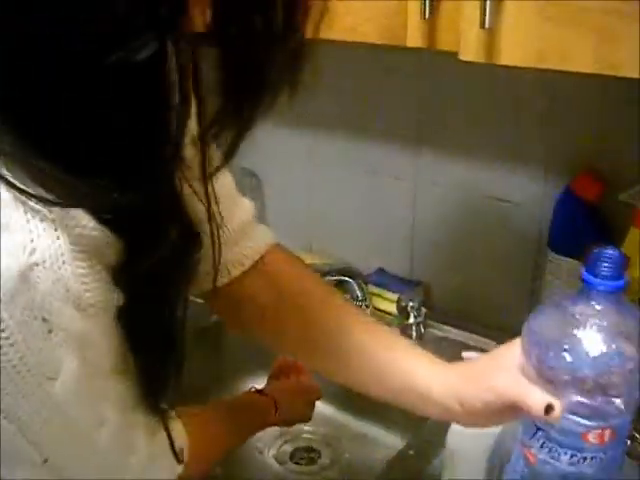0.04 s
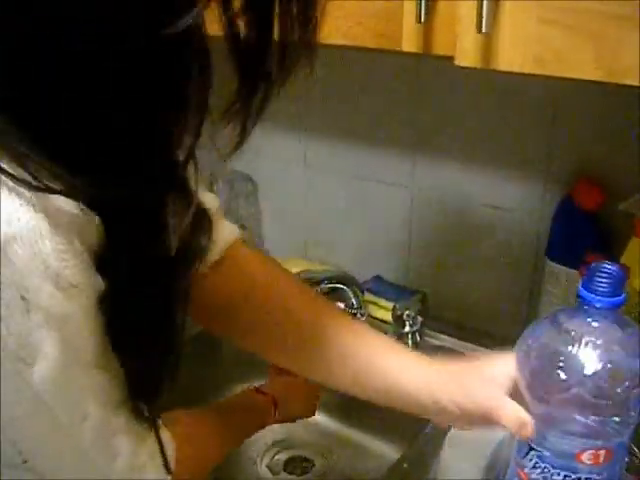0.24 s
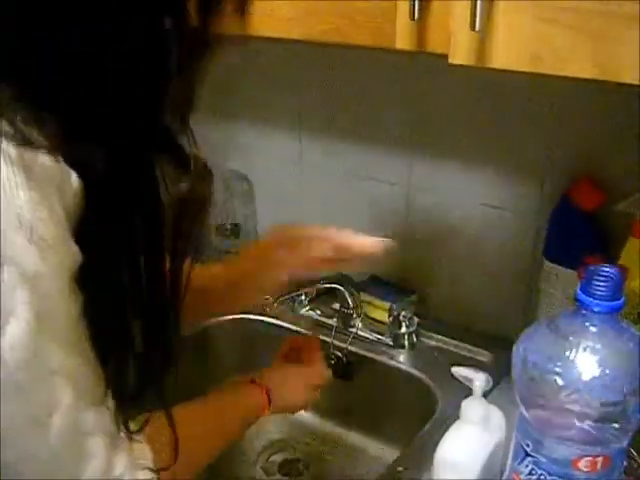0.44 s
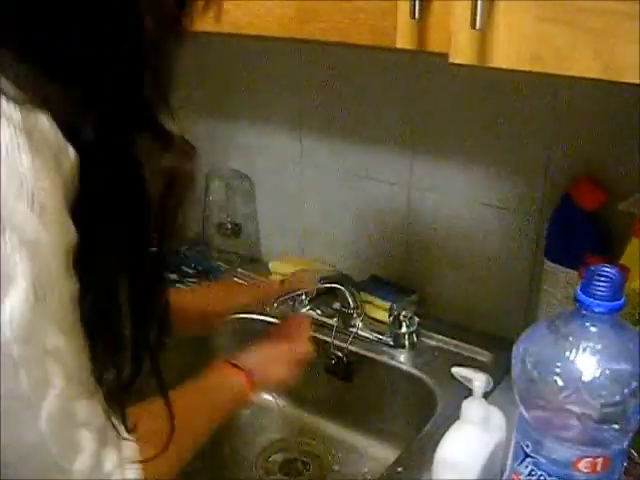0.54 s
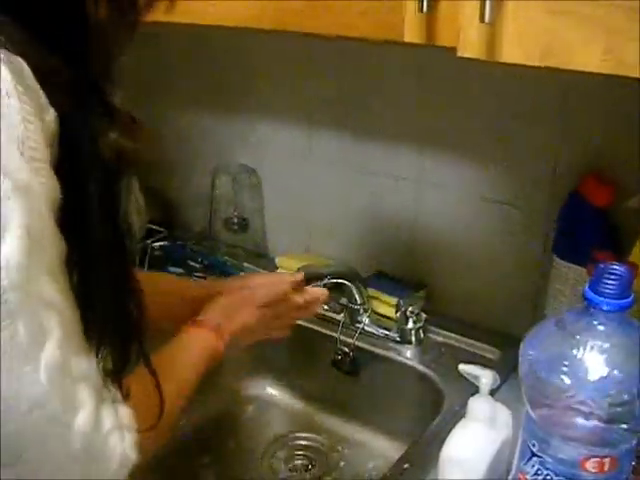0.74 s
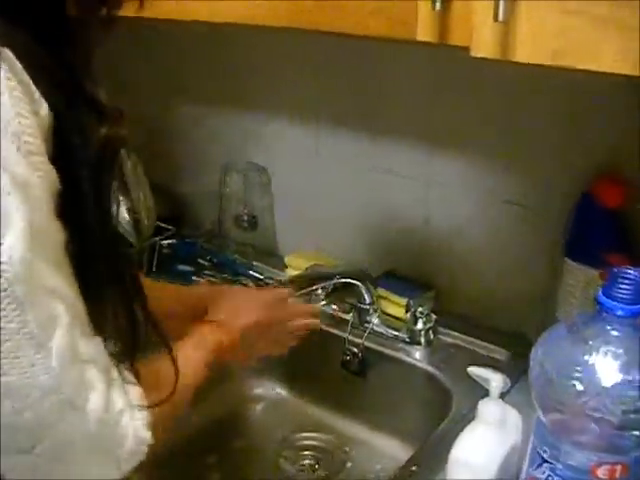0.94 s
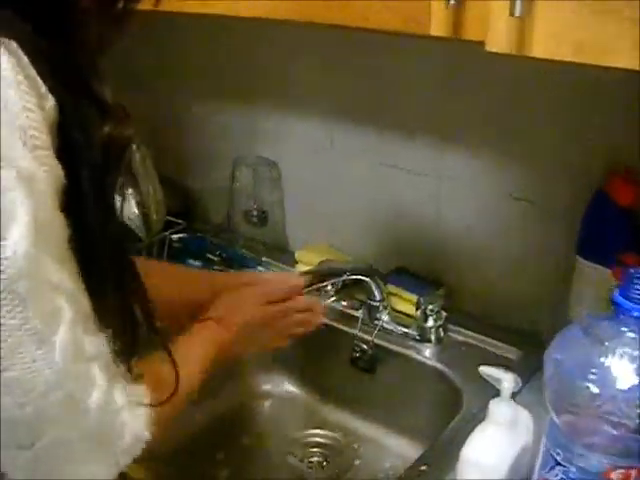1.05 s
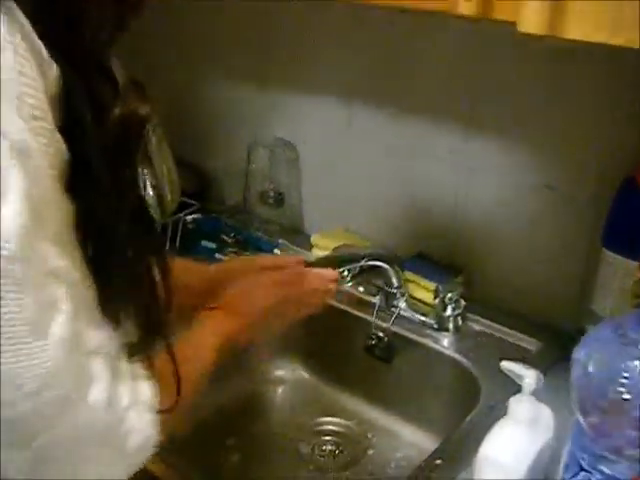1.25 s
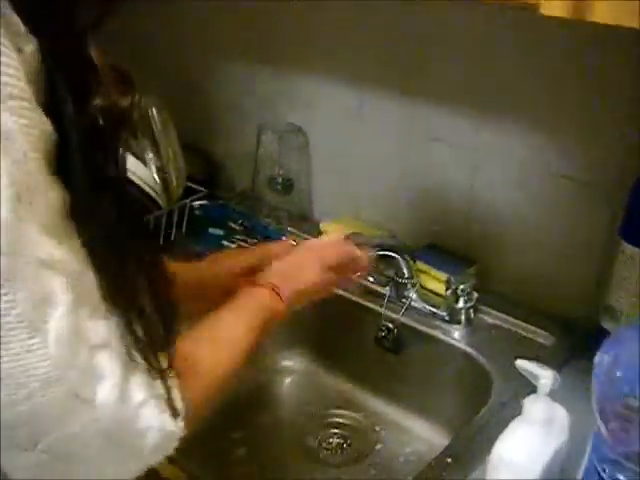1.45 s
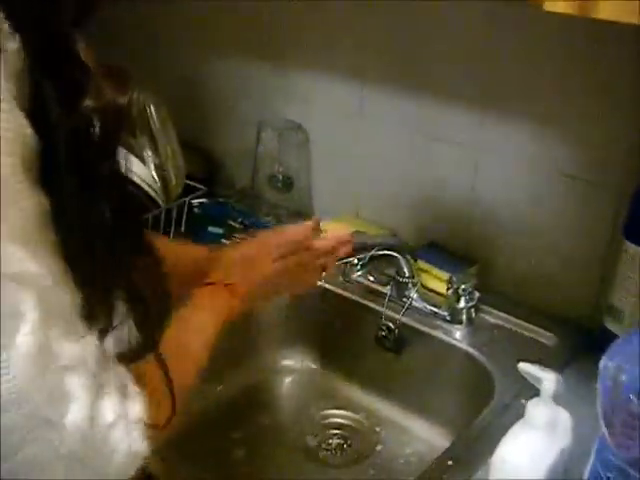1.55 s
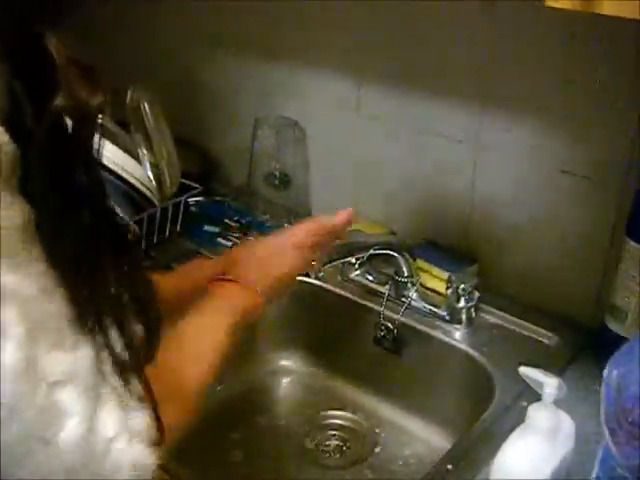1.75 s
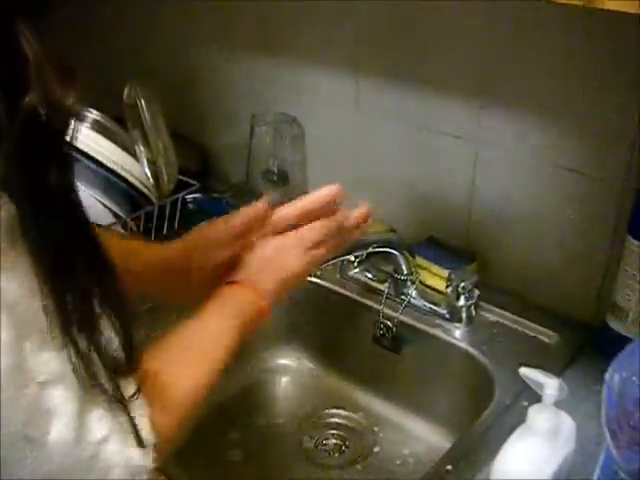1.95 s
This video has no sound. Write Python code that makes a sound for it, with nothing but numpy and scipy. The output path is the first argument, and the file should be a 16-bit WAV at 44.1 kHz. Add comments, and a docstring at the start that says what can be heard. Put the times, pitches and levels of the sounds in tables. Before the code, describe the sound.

Wet hands rubbing together, just after a plastic bottle thuds onto a kitchen worktop.

```python
"""A large plastic bottle is set down beside a steel sink and rocks to rest: each knock rings the
worktop, which booms, while the cupboard rattles and the bottle's thin wall crinkles.
Then wet hands meet and rub: skin swishes, the water film fizzes, air pockets pop, and the palms
slap, twice softly and once harder. A small kitchen, heard through a hissy little microphone;
a thin, high hiss at the start fades as the bottle lands."""
import sys
import numpy as np
from scipy import signal
from scipy.fft import rfft, irfft
from scipy.io import wavfile

SR = 44100
rng = np.random.default_rng(int(sys.argv[2]) if len(sys.argv) > 2 else 0)


def output_pcm(signal):
    """Save a mono or channel-first signal as 16-bit PCM at the path in sys.argv[1].

    Samples are clipped to [-1, 1] before scaling.
    """
    pcm = np.clip(np.atleast_2d(signal).T, -1, 1) * 32767
    wavfile.write(sys.argv[1], SR, np.round(pcm).astype(np.int16))


N = 88200
T = np.arange(N) / SR

# the bottle hits the worktop, each contact favouring one pitch: start_s, level_db, pitch_hz
BOTTLE_KNOCKS = [(0.0285, -16.5, 240), (0.0519, -16.5, 83), (0.153, -3.5, 420), (0.1599, -5, 97.5),
                 (0.1898, -11, 132), (0.2109, -13, 195), (0.2389, -13.5, 89)]
# ringing modes of worktop, sink and bottle: pitch_hz, level_db, t60_s
WORKTOP_MODES = [(40.3, -19, 1.25), (95.3, -13, 1), (120.2, 4, 0.14), (140.87, 0.5, 0.33),
                 (158, -8.5, 0.56), (185.4, -11, 0.78), (248, -10, 0.22), (378, -6.5, 0.056),
                 (398.1, -18, 0.57), (425, 0.7, 0.036), (1056, -20.5, 0.26), (1227, -10.5, 0.076)]
# tone of the cupboard's rattle: frequency_hz, level_db
RATTLE_SPECTRUM = [(45, -20), (80, 1), (170, -5), (290, -4.5), (550, -4), (1100, -17.5), (2000, -26),
                   (5500, -25.5), (14000, -33.5)]
# the bottle's thin wall crinkles: start_s, length_s, level_db, centre_hz
WALL_CRINKLES = [(0.1528, 0.0069, -28.5, 2050), (0.166, 0.015, -28.5, 3180), (0.29, 0.019, -32.5, 6720),
                 (0.327, 0.022, -40, 5400)]
# the water film is squeezed out: start_s, length_s, level_db, centre_hz, spread_octaves
WATER_SQUIRTS = [(0.4622, 0.017, -33.5, 9000, 0.71), (0.7405, 0.02, -27, 6450, .95),
                 (0.973, 0.033, -41, 11000, 0.68), (1.03, 0.0082, -36, 13100, .2),
                 (1.108, 0.024, -31, 9500, .9), (1.235, 0.017, -33, 5900, 0.47),
                 (1.255, 0.02, -38, 13000, .3), (1.4146, 0.002, -24, 5660, 0.84),
                 (1.612, 0.0073, -32, 10500, 0.33), (1.655, 0.014, -38, 14000, 0.32),
                 (1.675, .014, -31.5, 3640, .5), (1.786, 0.0077, -28.5, 6000, 0.41),
                 (1.928, 0.0056, -24.5, 4000, 1.5)]
# soft bumps against the sink cupboard: peak_s, half_length_s, level_db
CUPBOARD_BUMPS = [(0.575, 0.013, -44), (0.95, 0.06, -46), (1.208, 0.03, -32.5), (1.81, 0.028, -39)]
# body of the bumped cupboard: pitch_hz, level_db, width_hz
CUPBOARD_MODES = [(170, 4, 60), (310, -6, 104)]
# fader ride of the hand strokes: time_s, level_db
STROKE_LEVELS = [(0.70, -67), (0.77, -46), (0.87, -50), (0.97, -38.5), (1.04, -49), (1.11, -38.5),
                 (1.18, -46.5), (1.24, -39), (1.32, -51), (1.42, -41), (1.50, -41), (1.57, -48),
                 (1.66, -36.5), (1.71, -44.5), (1.79, -37), (1.845, -53), (1.88, -35), (1.95, -33.5),
                 (2.0, -40.5)]
# tone of skin on skin: frequency_hz, level_db
SKIN_SPECTRUM = [(250, -37), (600, -5.5), (1200, 1), (1900, -5), (2700, -2.5), (3500, -0.5), (5500, 1),
                 (9500, -6), (16000, -18.5)]
# air pockets pop between the palms: start_s, level_db, pitch_hz
AIR_POPS = [(0.7995, -16.5, 3350), (0.9364, -18, 3220), (0.9528, -18.5, 5900), (0.9638, -17.5, 4680),
            (0.965, -13.5, 9300), (0.9813, -15.5, 5930), (1.0578, -21, 3250), (1.0647, -14.5, 6060),
            (1.123, -12, 5420), (1.3886, -16, 6650), (1.4217, -13.5, 4130), (1.48, -15.5, 5230),
            (1.5738, -21.5, 4480), (1.6498, -23, 2300), (1.673, -19, 5900), (1.774, -17.5, 5600),
            (1.9216, -11, 6100), (1.955, -12.5, 4650)]
# the palms slap together: start_s, level_db, pitch_ratio
PALM_SLAPS = [(1.094, -37, 1.02), (1.2208, -31, 0.96), (1.8634, -24.5, 1)]
# ring of the hollow between the palms: pitch_hz, level_db
HOLLOW_MODES = [(1280, -1.5), (2230, -5), (3570, 1.5), (5300, 3)]
# tone of the low background bed: frequency_hz, level_db
MURK_SPECTRUM = [(25, -15), (45, -1), (70, -5.5), (150, -1.5), (350, -2.5), (800, -11), (1600, -19),
                 (4000, -24.5)]
# tone of the microphone's hiss: frequency_hz, level_db
HISS_SPECTRUM = [(1000, 5.5), (3000, -3.5), (16000, 2)]
# fader ride of the hiss: time_s, level_db
HISS_LEVELS = [(0, -36.5), (0.14, -41.5), (0.3, -46), (0.68, -47), (0.9, -44.5), (2, -45.5)]
# the microphone's treble peak and dull top: frequency_hz, gain_db
MICROPHONE_EQ = [(8800, 0.5), (10300, 3), (12000, -4), (16000, -3.5)]


def from_db(db):
    """Decibels as a gain."""
    return 10 ** (np.asarray(db) / 20)


def fader(rows):
    """Gain over time from rows of time_s, level_db."""
    return from_db(np.interp(T, *np.transpose(rows)))


def decay(start_s, t60_s):
    """Instant attack to 1, then an exponential tail."""
    return (T >= start_s) * np.exp(-np.log(1000) * np.maximum(T - start_s, 0) / t60_s)


def swell(peak_s, half_length_s):
    """A bell-shaped fade in and out."""
    return np.exp(-0.5 * ((T - peak_s) / half_length_s) ** 2)


def add(out, start_s, sound):
    """Drops a sound into the mix at its start time."""
    part = out[int(start_s * SR):][:len(sound)]
    part += sound[:len(part)]


def rms_one(x):
    """Normalises to rms 1."""
    return x / np.sqrt(np.mean(x ** 2) + 1e-20)


def white():
    """Fresh white noise."""
    return rng.standard_normal(N)


def grains(per_s, spread_db):
    """Random tiny clicks, made uneven in size by the spread; rms 1."""
    sizes = from_db(spread_db * np.minimum(rng.exponential(1, N), 4))
    return rms_one(sizes * rng.choice([-1, 1], N) * (rng.random(N) < per_s / SR))


def resonance(f, hz, width_hz):
    """Band-pass curve of one resonance, 1 at its peak."""
    return 1 / np.hypot(1, (f * f - hz * hz) / (f * width_hz))


def shaped(x, gain_of_freq):
    """Noise through a filter curve; rms 1."""
    freq = np.maximum(np.fft.rfftfreq(N, 1 / SR), 1)
    return rms_one(irfft(rfft(x) * gain_of_freq(freq), N))


def coloured(x, spectrum):
    """Noise through an EQ of frequency_hz, level_db points, rolled off below the first; rms 1."""
    hz, db = np.transpose(spectrum)
    return shaped(x, lambda f: from_db(np.interp(np.log(f), np.log(hz), db))
                  * np.minimum(f / hz[0], 1) ** 2)


def resonant_noise(modes):
    """Noise ringing in modes of pitch_hz, level_db, width_hz; rms 1."""
    return shaped(white(), lambda f: sum(from_db(db) * resonance(f, hz, width) ** 2
                                         for hz, db, width in modes))


def swarm(start_s, length_s, db, centre_hz, octaves):
    """A burst of tiny clicks around one pitch that swells quickly and fades."""
    age = np.maximum(T - start_s, 0) / (length_s * 0.4)
    clicks = grains(per_s=3700, spread_db=2)
    fizz = shaped(clicks, lambda f: np.exp(-0.5 * (np.log2(f / centre_hz) / octaves) ** 2))
    return from_db(db) * age * np.exp(1 - age) * fizz


def background():
    """A steady low murk under the microphone's hiss, which is loudest at the start."""
    murk = from_db(-43.5) * coloured(white(), MURK_SPECTRUM)
    return murk + fader(HISS_LEVELS) * coloured(white(), HISS_SPECTRUM)


def opening_hiss():
    """A thin, airy high hiss swells at the start and fades as the bottle lands."""
    hiss = shaped(white(), lambda f: resonance(f, hz=14300, width_hz=2200))
    return from_db(-38.5) * swell(peak_s=0.056, half_length_s=0.11) * hiss


def scrape():
    """The bottle's base judders over the worktop before it lands: a short, hollow drag."""
    plastic = shaped(white(), lambda f: resonance(f, hz=541, width_hz=120) ** 2)
    return from_db(-29) * swell(peak_s=0.038, half_length_s=0.035) * plastic


def bottle_knocks(attack_cycles=0.44, contact_q=0.9):
    """Each knock rings the worktop's modes, favouring those near its pitch; a rattle and a boom linger."""
    ring, rattle_power, boom_power = np.zeros((3, N))
    for start_s, db, contact_hz in BOTTLE_KNOCKS:
        for hz, mode_db, t60_s in WORKTOP_MODES:
            envelope = (1 - np.exp(-T * hz / attack_cycles)) * decay(0, t60_s)
            strength = from_db(db + mode_db) * resonance(hz, contact_hz, contact_hz / contact_q)
            add(ring, start_s, strength * envelope * np.sin(2 * np.pi * hz * T))
        rattle_power += (from_db(db) * decay(start_s, t60_s=0.58)) ** 2
        boom_power += (from_db(db) * decay(start_s, t60_s=1.48)) ** 2
    boom = np.sqrt(boom_power) * shaped(white(), lambda f: resonance(f, hz=140.5, width_hz=119) ** 2)
    rattle = np.sqrt(rattle_power) * coloured(grains(per_s=2000, spread_db=0), RATTLE_SPECTRUM)
    return ring + from_db(-17) * rattle + from_db(-24) * boom


def crinkles():
    """The bottle's thin wall crinkles in narrow bands of crackle."""
    return sum(swarm(*crinkle, octaves=0.29) for crinkle in WALL_CRINKLES)


def squirts():
    """The hands squeeze out the water film in bright spurts of fizz."""
    return sum(swarm(*squirt) for squirt in WATER_SQUIRTS)


def bumps():
    """The cupboard hums briefly when it is nudged."""
    push = sum(from_db(db) * swell(peak_s, half_s) for peak_s, half_s, db in CUPBOARD_BUMPS)
    return push * resonant_noise(CUPBOARD_MODES)


def rubbing():
    """Skin slides on skin in a grainy swish; threads of water snap with sharp ticks and bubbles burst."""
    swish = coloured(grains(per_s=4000, spread_db=4) + 0.22 * white(), SKIN_SPECTRUM)
    ticks = shaped(grains(per_s=110, spread_db=2), lambda f: resonance(f, hz=8500, width_hz=8500) ** 2)
    return fader(STROKE_LEVELS) * (swish + from_db(-8.5) * ticks + bubbles())


def air_pocket(hz, attack_cycles=1.17, chirp_per_cycle=0.0022):
    """One air pocket swells in about a cycle and rings out, rising in pitch."""
    cycles = np.arange(400) / SR * min(hz, SR / 3)
    age = cycles / attack_cycles
    return age * np.exp(1 - age) * np.sin(2 * np.pi * cycles * (1 + chirp_per_cycle * cycles))


def bubbles(count=240, centre_hz=4880, spread_octaves=1.08, over_swish_db=7.5, range_db=11):
    """Tiny bubbles burst at random times, levels and pitches."""
    out = np.zeros(N)
    for when, softness, height in rng.random((count, 3)):
        hz = centre_hz * 2 ** (spread_octaves * (2 * height - 1))
        add(out, when * N / SR, from_db(over_swish_db - range_db * softness) * air_pocket(hz))
    return out


def pops(afterpops=4, lag_s=0.0008, scatter_s=0.0035, pitch_spread=0.14):
    """Air pops between the palms, each pop setting off a few softer ones near its pitch."""
    out = np.zeros(N)
    for start_s, db, hz in AIR_POPS:
        onset_s = start_s + lag_s
        add(out, onset_s, from_db(db - 3) * air_pocket(hz))
        for wait, detune in rng.standard_normal((afterpops, 2)):
            afterpop = air_pocket(hz * np.exp(pitch_spread * detune))
            add(out, onset_s + scatter_s * abs(wait), from_db(db - 12) * afterpop)
    return out


def slaps(crack_db=9, hollow_q=9):
    """A sharp wet crack, a dying splash and the hollow of the palms, pitched by how they are cupped."""
    out = np.zeros(N)
    crack_and_tail = from_db(crack_db) * decay(0, t60_s=0.0025) + decay(0, t60_s=0.076)
    for start_s, db, ratio in PALM_SLAPS:
        modes = [(hz * ratio, mode_db, hz * ratio / hollow_q) for hz, mode_db in HOLLOW_MODES]
        hollow = 2 * decay(0, t60_s=0.057) * resonant_noise(modes)
        splash = crack_and_tail * coloured(white(), SKIN_SPECTRUM)
        add(out, start_s, from_db(db) * (splash + hollow))
    return out


def kitchen(x):
    """Adds a tight room: quick reflections from sink and wall, then a short, softer tail."""
    early = grains(per_s=1700, spread_db=-0.5) * decay(0.002, t60_s=0.013)
    tail = shaped(white(), lambda f: 1 / np.hypot(1, f / 8000)) * decay(0.008, t60_s=0.17)
    reverb = from_db(-4) * rms_one(early) + from_db(-13.5) * rms_one(tail)
    return x + signal.fftconvolve(x, reverb / np.sqrt(N))[:N]


def scene():
    """The mono mix: bottle, then hands, over the background; only the hands get the reverb."""
    opening = opening_hiss() + scrape() + bottle_knocks() + crinkles()
    hands = kitchen(squirts() + rubbing() + pops() + slaps())
    return (background() + opening + bumps() + hands)[None]


def record(dry, notch_hz=7856, notch_width_hz=1790, cutoff_hz=15850):
    """The little microphone: a peak and a deep notch in the treble, a hard clip and a steep high cut."""
    eq = from_db(np.interp(np.fft.rfftfreq(N, 1 / SR), *np.transpose(MICROPHONE_EQ)))
    peaked = irfft(rfft(dry) * eq, N)
    notched = signal.lfilter(*signal.iirnotch(notch_hz, notch_hz / notch_width_hz, fs=SR), peaked)
    high_cut = signal.ellip(12, 0.2, 75, cutoff_hz, fs=SR, output="sos")
    return signal.sosfilt(high_cut, np.clip(notched, -1, 1))


dry = scene()
out = record(dry)
output_pcm(out)
```